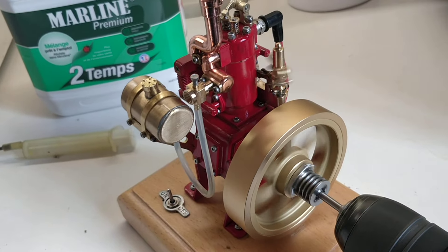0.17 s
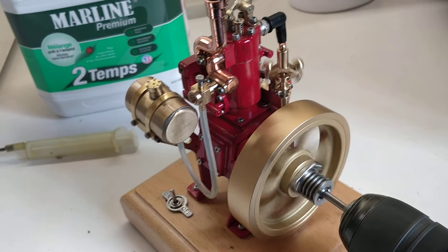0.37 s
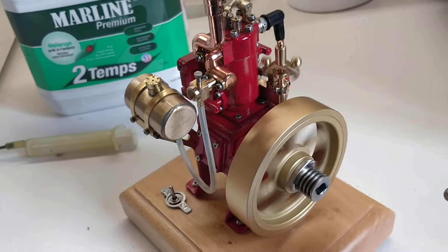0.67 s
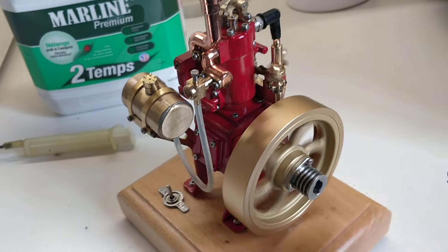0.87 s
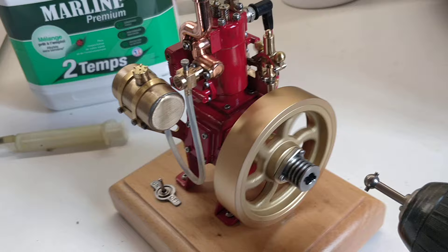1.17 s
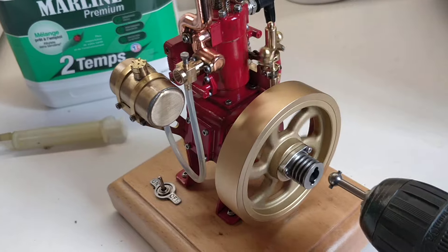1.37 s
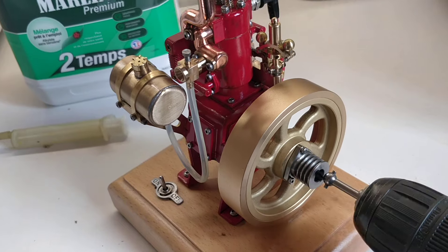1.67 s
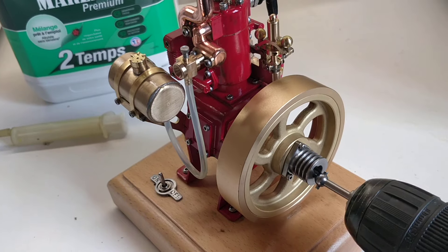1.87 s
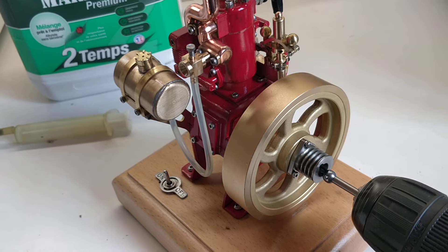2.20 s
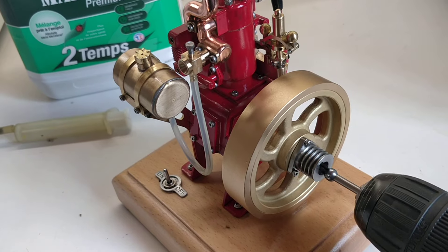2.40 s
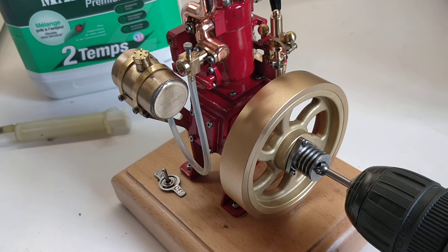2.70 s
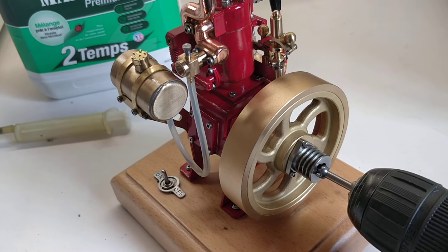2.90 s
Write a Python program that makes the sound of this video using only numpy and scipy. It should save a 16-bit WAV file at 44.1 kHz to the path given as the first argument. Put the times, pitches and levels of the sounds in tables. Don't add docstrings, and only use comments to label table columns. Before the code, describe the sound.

A cordless drill whirs loudly, brakes to a sudden stop, then gives one short blip.

```python
import sys
import numpy as np
from scipy import signal
from scipy.fft import rfft, irfft
from scipy.io import wavfile
from scipy.ndimage import uniform_filter1d

SR = 44100
rng = np.random.default_rng(int(sys.argv[2]) if len(sys.argv) > 2 else 0)


def boost(x):
    u = np.asarray(x, float) / 20
    return 10 ** u


def int16_out(signal):
    q = np.round(np.clip(np.atleast_2d(signal).T, -1, 1) * 32767)
    wavfile.write(sys.argv[1], SR, q.astype(np.int16))


N = 134505
TIME = np.arange(N) / SR

# [t/s, beats counted so far]
FAN_BEATS = [(0, -17.03), (1.94, 17.5), (2.21, 22.5), (3.05, 36.93)]
# [f/Hz, density/dB per Hz]
AIR_SPECTRUM = [(25, -11), (60, -20), (140, -13.5), (240, -20), (340, -17.5), (500, -26), (3200, -33),
                (5000, -35.5), (8000, -45)]
# [f/Hz, width/Hz, level/dB]
SOCKET = [(426, 50, 4), (1715, 40, 8.5), (1936, 200, -4), (3082, 300, -6.5), (4360, 300, -5)]
# [t/s, peak/dB, ring f/Hz, t60/s, crack f/Hz]
TICKS = [(.864, -38.5, 1665, 0.084, 1640), (.889, -36.5, 1025, 0.049, 1010), (.889, -39, 265, 0.13, 277),
         (.9245, -37, 3610, 0.1, 3700), (.925, -36, 2070, .06, 1880), (.9705, -40, 3730, 0.036, 1560),
         (.993, -53, 1300, 0.026, 1300), (1.093, -45.5, 1835, 0.053, 2200), (1.15, -43, 1642, 0.1, 1530),
         (1.15, -41.5, 3140, 0.034, 4470), (1.21, -55, 1450, 0.057, 1500), (1.352, -50, 1600, 0.03, 1610),
         (1.362, -43.5, 3550, 0.038, 2400), (1.362, -47, 1820, 0.052, 1754),
         (1.437, -43.5, 2010, 0.03, 3000), (1.448, -39, 362, 0.061, 450), (1.45, -55, 3940, .06, 3830),
         (1.516, -56, 4000, .04, 4000), (1.577, -57, 5270, 0.1, 5530), (1.672, -52.5, 1598, .035, 2200),
         (1.7252, -43, 1025, 0.032, 700), (1.7252, -41.5, 2900, 0.031, 3060),
         (1.8125, -42.5, 900, 0.027, 920), (1.8575, -41, 910, 0.033, 950), (1.8575, -44, 2786, .05, 2530),
         (2.262, -49.5, 2907, 0.033, 1300), (2.292, -48.5, 397, .11, 700), (2.518, -50.5, 3060, .04, 1992),
         (2.543, -48.5, 1610, .04, 2600), (2.7113, -35.5, 5140, 0.03, 3850),
         (2.713, -40.5, 790, 0.037, 927), (2.718, -46.5, 300, .06, 400), (2.724, -47, 5350, 0.017, 5000),
         (2.763, -40, 5000, 0.016, 3550), (2.764, -48, 300, 0.055, 700), (2.974, -53.5, 690, 0.045, 1000)]
# [t/s, length/s, level/dB, f/Hz]
THUMPS = [
    (.0, 0.75, -52, 90),
    (.76, .15, -52, 120),
    (2.15, 0.3, -61, 90),
    (2.71, .11, -56, 110),
]
# [t/s, length/s, level/dB, f/Hz]
SCRAPES = [(.066, 0.01, -18, 2553), (.113, .019, -14, 4700), (0.189, 0.0075, -19, 3000),
           (.295, .02, -26.5, 2653), (0.341, 0.028, -19, 2987), (0.44, 0.022, -23.5, 2900),
           (2.009, .012, -26.5, 2570), (1.864, 0.017, -53.5, 2617)]
# [t/s, peak/dB, ring f/Hz, t60/s, crack f/Hz]
KNOCKS = [(.0665, -13, 2630, 0.041, 2430), (.331, -3.5, 2700, 0.043, 3050),
          (.3405, -5.5, 3510, 0.022, 3480), (.348, -7.5, 2566, 0.078, 3000), (.3495, -13, 170, 0.055, 270),
          (.7175, -9.5, 2910, 0.026, 2950), (.7185, -14.5, 1766, 0.07, 2000),
          (.7565, -10.5, 2760, 0.039, 3020), (1.958, -38.5, 794, 0.029, 1210),
          (1.9625, -30.5, 4800, 0.016, 3460), (2.1245, -30, 3100, .02, 4870),
          (2.1275, -12.5, 2610, 0.0234, 4550)]
# [t/s, f/Hz, level/dB]
WHINE = [(1.972, 5320, -58), (1.976, 4700, -26), (1.982, 3350, -33), (2.004, 3380, -32.5),
         (2.014, 3620, -34.5), (2.04, 3780, -33.5), (2.062, 4000, -33.5), (2.069, 4780, -24),
         (2.077, 4880, -58.5)]
# [t/s, armature f/Hz, gear level/dB, commutator level/dB]
LONG_RUN = [
    (0, 330.6, -22.5, -37),
    (.3, 333.7, -21.5, -39.5),
    (.55, 329.9, -23.5, -38.5),
    (.708, 332.5, -22.5, -33),
    (.722, 285, -21.5, -23.5),
    (.738, 204.4, -22, -23),
    (.746, 170, -30, -40),
    (.762, 80, -33, -48),
    (.772, 40, -60, -73),
]
# [t/s, armature f/Hz, gear level/dB, commutator level/dB]
BLIP = [(1.958, 4.94, -62, -83), (1.964, 8.2, -55, -66), (1.976, 44.4, -41, -77), (2.0, 107, -32.5, -47),
        (2.018, 180, -29, -42), (2.04, 203, -28, -38.5), (2.072, 250, -33, -43.5), (2.085, 215, -25.5, -26),
        (2.097, 130, -30, -43.5), (2.11, 86, -37.5, -56), (2.124, 41, -41, -76), (2.13, 20, -78, -88)]
# [multiple of armature speed, level re gears/dB, wobble/dB]
ARMATURE_ORDERS = [(6, -19.5, 4), (9, -21, 2.5), (12, -19.5, 1), (4, -24, 3.5), (5, -25, 3),
                   (2.4, -29.5, 0.5), (6.46, -25, 3.5), (7.89, -17, 3.5), (8.66, -20.5, 3.5),
                   (12.96, -26, 2.5), (17, -28, 3.5)]
# [f/Hz, density/dB per Hz]
GEAR_SPECTRUM = [(30, -29), (70, -26), (255, -10), (340, -15), (606, -12), (971, -6.5), (1720, -7),
                 (7080, -9), (8000, -18), (10400, -38.5), (17600, -120)]
# [f/Hz, width/Hz, gain/dB]
SHELL = [(1984, 110, 7), (2543, 180, 6), (2865, 120, 5.5), (3350, 250, 2.5), (3900, 460, 4),
         (4700, 410, 3.5), (7040, 680, 5)]

FULL_SPEED_HZ = 332
FANS_HZ, FANS_DB = 239, (-63, -63.5)
AIR_DB = -62.5
RUB_S, RUB_DB = (2.73, 2.89, 3.09), -61.5
SHAFT_DB, SHAFT_LAW = -39.5, 6.0
SPINDLE_RATIO, SPINDLE_DB = 9.45, 1.2
CHUCK_HZ, CHUCK_WIDTH_HZ = 1770, 100
CHUCK_S, CHUCK_DB = (.4, .58, 1.501, 1.9), (4.5, 13, 14, 6)
ROOM_T60_S, ROOM_DB = 0.24, -10.5
LATE_T60_S, LATE_DB, LATE_TOP_HZ = 0.36, -20, 4000
TICK_DRY_DB, KNOCK_DRY_DB = -6, -5
SIDE_HZ, SIDE_DB = 6800, -24
MIC_LOW_HZ, MIC_TOP_HZ = 44.5, 7890


def level(x, db):
    return x * boost(db) / np.sqrt(np.mean(x ** 2))


def walk(rate):
    k = int(SR / rate)
    held = np.repeat(rng.standard_normal(N // k + 1), k)
    return 1.3 * uniform_filter1d(uniform_filter1d(held, k), k)[:N]


def grit(db):
    return rng.standard_normal(N) * boost(db * np.minimum(rng.exponential(size=N), 4))


def colour(x, points):
    p = np.array(points)
    hz = np.maximum(np.arange(N // 2 + 1) * SR / N, 1)
    gain_db = np.interp(np.log(hz), np.log(p[:, 0]), p[:, 1])
    return irfft(rfft(x) * boost(gain_db), N)


def band(x, hz, width):
    return signal.lfilter(*signal.iirpeak(hz, hz / width, SR), x)


def curve(rows):
    r = np.array(rows)
    on = (TIME >= r[0, 0]) & (TIME <= r[-1, 0])
    return [np.interp(TIME, r[:, 0], column) for column in r.T[1:]] + [on]


def scrapes(rows):
    out = np.zeros(N)
    for s, length, db, hz in rows:
        progress = np.clip((TIME - s) / length, 0, 1)
        rough = level(band(grit(3.5), hz, 0.65 * hz), db)
        out += rough * np.sin(np.pi * progress ** 0.97) ** 2
    return out


def hits(rows, ring_db, crack_db, snap_db):
    size = 8192
    out, t = np.zeros(N + size), np.arange(size) / SR
    for s, db, hz, t60, crack_hz in rows:
        fade = np.exp(-np.log(1000) * t / t60)
        ring = np.sin(2 * np.pi * hz * t) * fade ** 2.0 * np.minimum(t / 0.00063, 1)
        push = rng.standard_normal(size) * fade
        push[0] = boost(snap_db)
        width = 0.97 * crack_hz
        crack = band(band(push, crack_hz, width), crack_hz, width)
        crack /= np.abs(crack).max()
        i = int(s * SR)
        out[i:i + size] += boost(db) * (boost(ring_db) * ring + boost(crack_db) * crack)
    return out[:N]


def fans():
    beats = curve(FAN_BEATS)[0]
    out = np.zeros(N)
    for db, way in zip(FANS_DB, (-1, 1)):
        phase = 2 * np.pi * (FANS_HZ * TIME + way * beats / 2) + 0.04 * walk(4.4)
        out += np.sqrt(2) * boost(db + 0.3 * walk(10)) * np.sin(phase)
    return out


def room_air():
    air = np.zeros(N)
    for hz in 30 * 2. ** np.arange(9):
        air += band(rng.standard_normal(N), hz, hz / 1.4) * boost(1.2 * walk(4.5))
    resonance = level(band(rng.standard_normal(N), 3240, 170), -79) * boost(2 * walk(2.4))
    return level(colour(air, AIR_SPECTRUM), AIR_DB) + resonance


def rub():
    friction = rng.standard_normal(N) * boost(1.0 * walk(45))
    x = sum(boost(db) * level(band(friction, hz, width), 0) for hz, width, db in SOCKET)
    return level(x, RUB_DB) * np.interp(TIME, RUB_S, (0, 1, .6))


def ticks():
    return hits(TICKS, ring_db=-2.5, crack_db=-2.0, snap_db=15.5)


def knocks():
    struck = hits(KNOCKS, ring_db=0, crack_db=-3, snap_db=10.0)
    return signal.lfilter(*signal.butter(2, 110, "high", fs=SR), struck)


def shaft(rows):
    hz, _, _, on = curve(rows)
    turn = 2 * np.pi * np.cumsum(hz) / SR
    strength = boost(SHAFT_DB + 1.2 * walk(25)) * (hz / FULL_SPEED_HZ) ** SHAFT_LAW
    return on * np.sqrt(2) * strength * np.sin(turn + 0.29 * walk(11))


def whine():
    hz, db, on = curve(WHINE)
    phase = 2 * np.pi * np.cumsum(hz * (1 + 0.012 * walk(400))) / SR
    return on * np.sqrt(2) * boost(db + 2.0 * walk(300)) * np.sin(phase)


def gear_rattle(hz, turn):
    spindle = turn / SPINDLE_RATIO
    flutter = SPINDLE_DB * (np.sin(spindle) + np.cos(2 * spindle) / 2)
    teeth = grit(2.5) * boost(0.23 * walk(120) + 0.5 * walk(16) + flutter)
    chuck_gain = boost(np.interp(TIME, CHUCK_S, CHUCK_DB) + 2.0 * walk(30))
    teeth = teeth + (chuck_gain - 1) * band(teeth, CHUCK_HZ, CHUCK_WIDTH_HZ)
    shell = np.zeros(N)
    for f, width, db in SHELL:
        shell_gain = boost(db * hz / FULL_SPEED_HZ + 1.2 * walk(14))
        shell += (shell_gain - 1) * band(teeth, f, width)
    return level(colour(teeth + shell, GEAR_SPECTRUM), 0)


def speed_lines(turn):
    out = np.zeros(N)
    for k, db, wobble_db in ARMATURE_ORDERS:
        out += boost(db + wobble_db * walk(20)) * np.sin(k * (turn + 0.092 * walk(30)))
    return np.sqrt(2) * out


def commutator(turn, db):
    return np.sqrt(2) * boost(db + 1.8 * walk(40)) * np.sin(3 * turn + 0.19 * walk(35))


def drill(rows):
    hz, gear_db, line_db, on = curve(rows)
    turn = 2 * np.pi * np.cumsum(hz) / SR
    geared = (gear_rattle(hz, turn) + speed_lines(turn)) * boost(gear_db)
    return on * (geared + commutator(turn, line_db))


def room_tail(t60, db):
    t = TIME[:SR]
    decay = np.exp(-np.log(1000) * t / t60) * (t > .002)
    return level(rng.standard_normal(SR) * decay, db) / np.sqrt(SR)


def room(x):
    late = signal.lfilter(*signal.butter(1, LATE_TOP_HZ, fs=SR), room_tail(LATE_T60_S, LATE_DB))
    tail = room_tail(ROOM_T60_S, ROOM_DB) + late
    before = x[8192:0:-1]
    return x + signal.fftconvolve(np.r_[before, x], tail)[8192:N + 8192]


def scene():
    near = drill(LONG_RUN) + drill(BLIP) + whine() + scrapes(SCRAPES) + rub()
    knock, tick = knocks(), ticks()
    knock_dry, tick_dry = boost(KNOCK_DRY_DB), boost(TICK_DRY_DB)
    mono = room(near + (1 - knock_dry) * knock + (1 - tick_dry) * tick)
    mono = mono + knock_dry * knock + tick_dry * tick
    mono = mono + shaft(LONG_RUN) + shaft(BLIP) + scrapes(THUMPS) + fans() + room_air()
    treble = band(band(mono, SIDE_HZ, SIDE_HZ / 2), SIDE_HZ, SIDE_HZ / 2)
    side = boost(SIDE_DB) * np.roll(treble, 40)
    return np.array([mono + side, mono - side])


def roll_off(x):
    return signal.sosfilt(signal.butter(12, 8540, fs=SR, output="sos"), x)


def record(dry):
    cut = signal.sosfilt(signal.cheby1(12, .3, MIC_TOP_HZ, fs=SR, output="sos"), dry)
    cut = signal.lfilter(*signal.butter(1, MIC_LOW_HZ, "high", fs=SR), cut)
    return roll_off(cut)


dry = scene()
out = record(dry)
int16_out(out)
```